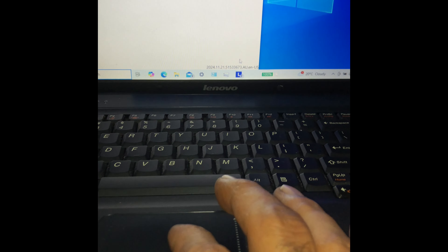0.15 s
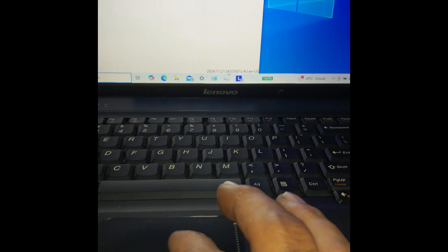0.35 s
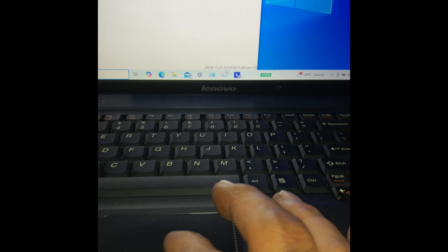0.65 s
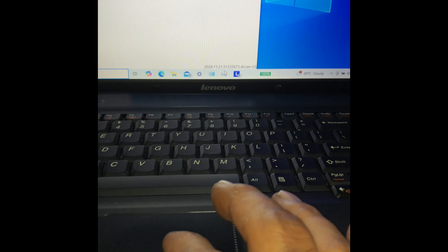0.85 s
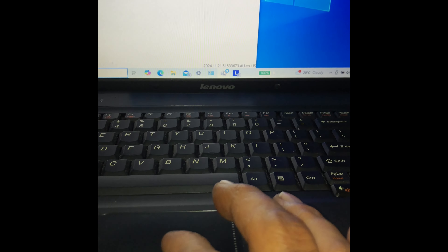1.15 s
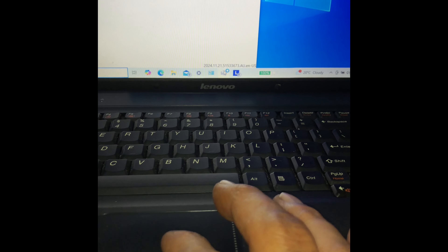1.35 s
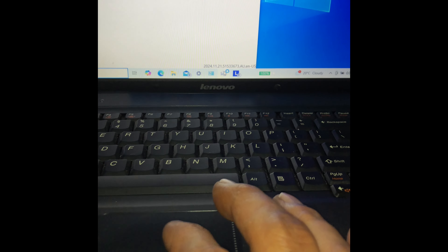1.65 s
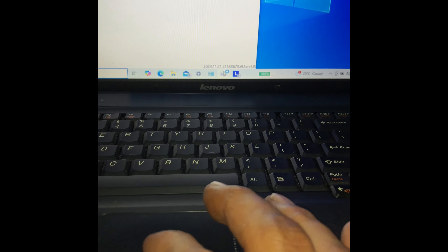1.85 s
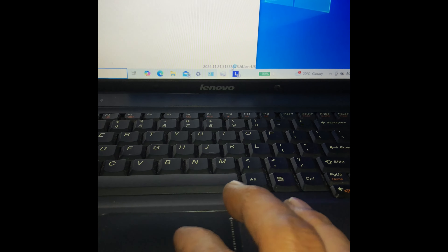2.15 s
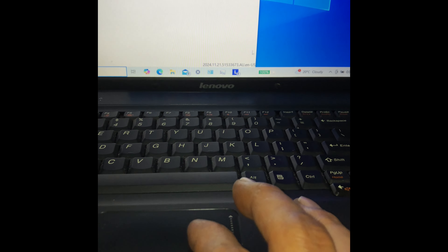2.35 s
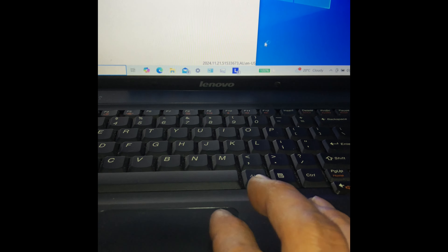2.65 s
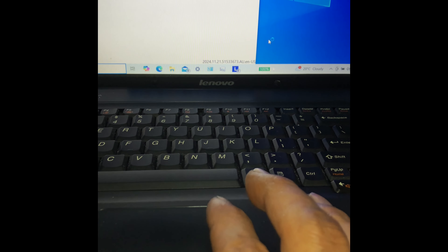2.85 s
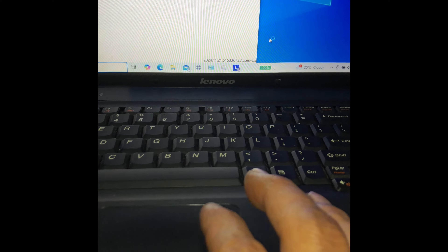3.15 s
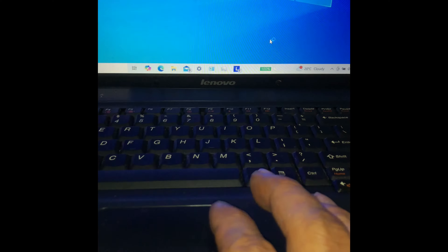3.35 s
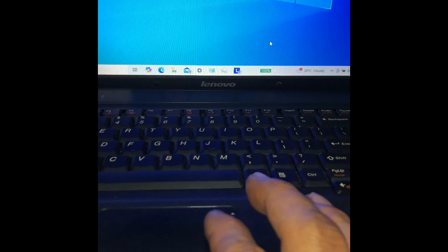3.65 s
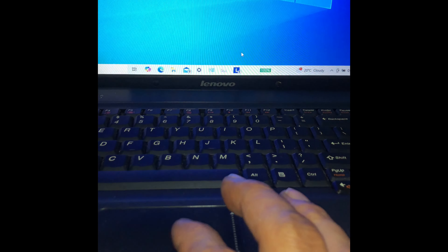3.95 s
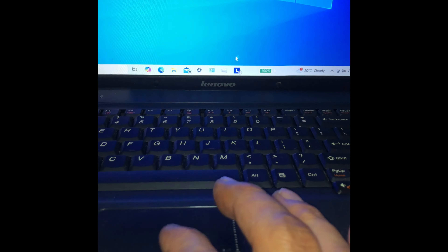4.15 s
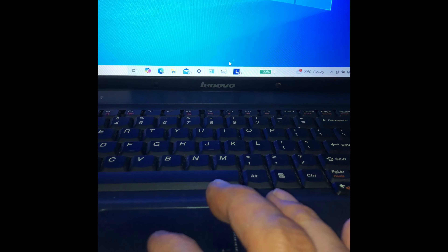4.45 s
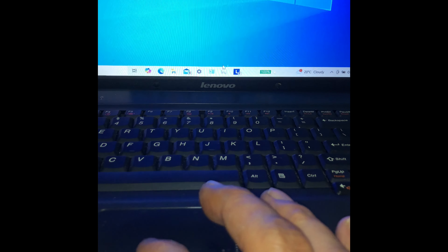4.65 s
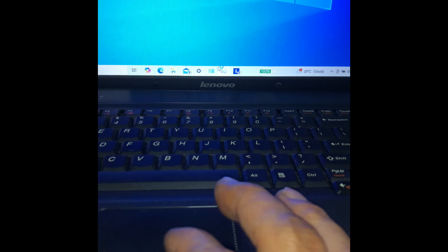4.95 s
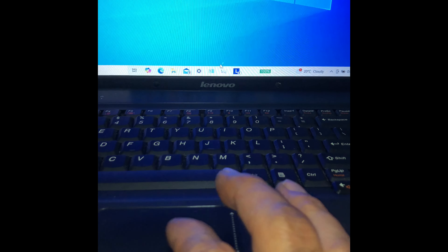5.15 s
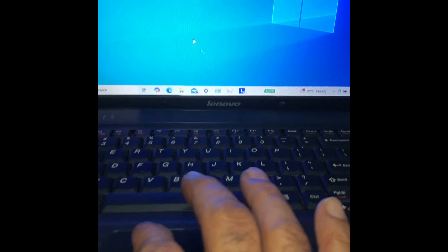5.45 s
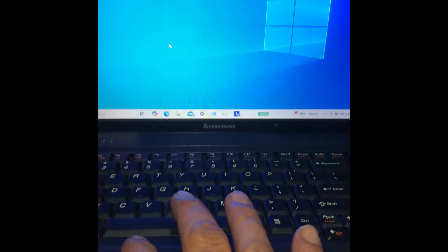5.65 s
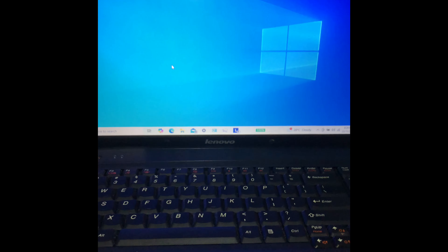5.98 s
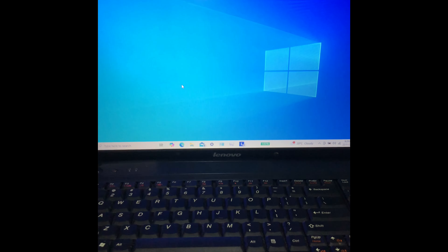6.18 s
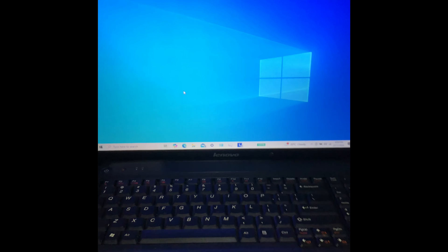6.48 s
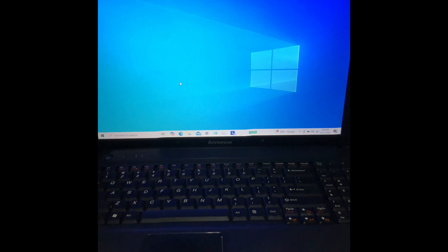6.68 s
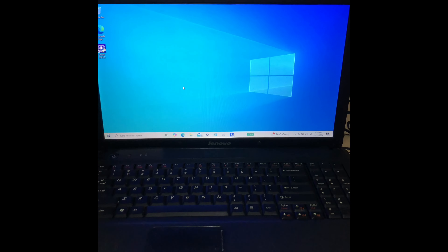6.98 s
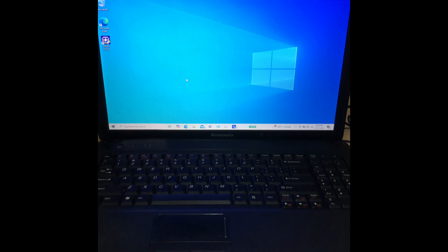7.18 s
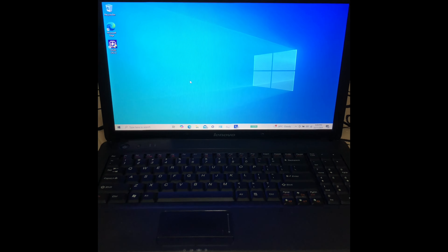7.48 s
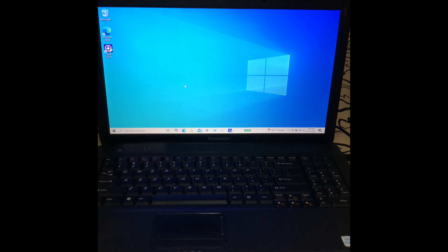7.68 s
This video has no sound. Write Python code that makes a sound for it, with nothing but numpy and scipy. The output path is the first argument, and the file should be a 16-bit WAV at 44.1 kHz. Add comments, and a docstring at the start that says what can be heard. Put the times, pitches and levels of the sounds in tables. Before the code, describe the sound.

A steady fan drone fills a quiet room, its airy rush dark and smooth, its motor humming with a slight waver. A lone soft knock sounds near the middle and another fainter one later. As the person holding the microphone leans back, fabric brushes briefly twice and the seat ticks and knocks irregularly for about a second, then settles with tiny creaks while the fan carries on.

```python
"""In a quiet room a fan runs steadily, and one microphone listens.
The fan's rushing air is noise coloured by the room and its housing; its mains motor hums in wavering sine tones.
Near the end the holder of the microphone leans back. Cloth slides twice, as hiss with a lower rustle,
and the seat ticks and knocks softly, as short bursts of damped ringing."""
import sys
import numpy as np
from scipy import signal
from scipy.fft import rfft, irfft, next_fast_len
from scipy.io import wavfile
from scipy.ndimage import uniform_filter1d

SR = 44100
rng = np.random.default_rng(int(sys.argv[2]) if len(sys.argv) > 2 else 0)


def transcribe(signal):
    """Save signal, clipped to [-1, 1], as a 16-bit WAV file at the path in sys.argv[1]."""
    frames = np.atleast_2d(signal).T
    limited = np.clip(frames, -1, 1)
    pcm = np.round(limited * 32767).astype(np.int16)
    wavfile.write(sys.argv[1], SR, pcm)


def boost_factor(decibels):
    """Convert a level in decibels to a linear amplitude factor."""
    exponent = np.asarray(decibels, float) / 20
    return 10 ** exponent


N = 344853
TIME = np.arange(N) / SR  # seconds


def unit(x):
    """Scale a signal to an rms of 1."""
    return x / np.sqrt(np.mean(x ** 2))


def walk(rate):
    """Smooth random wandering that changes about rate times a second, with an rms of 1."""
    length = max(int(SR / rate), 1)
    smoothed_once = uniform_filter1d(rng.standard_normal(N), length)
    return unit(uniform_filter1d(smoothed_once, length))


def noise(spectrum, resonances=()):
    """Noise coloured by a spectrum of (Hz, dB), raised or lowered around each resonance."""
    size = next_fast_len(N)
    hz = np.maximum(np.arange(size // 2 + 1) * SR / size, 1)
    points = np.array(spectrum, float)
    db = np.interp(np.log(hz), np.log(points[:, 0]), points[:, 1])
    # below the first point the level falls by 40 dB per decade
    db = db + 40 * np.minimum(np.log10(hz / points[0, 0]), 0)
    for centre_hz, width_hz, lift_db in resonances:
        db = db + lift_db / (1 + (2 * (hz - centre_hz) / width_hz) ** 2)
    white = rfft(rng.standard_normal(size))
    return irfft(white * boost_factor(db), size)[:N]


def band(x, low_hz, high_hz):
    """Keep only the pitches between two limits."""
    return signal.sosfilt(signal.butter(2, [low_hz, high_hz], "band", fs=SR, output="sos"), x)


def tone(hz, db, waver_db, drift_hz):
    """A sine whose level and pitch wander slowly as the air carries it."""
    cycles = np.cumsum(hz + drift_hz * walk(2.88)) / SR
    phase = 2 * np.pi * (rng.random() + cycles)
    return np.sqrt(2) * boost_factor(db + waver_db * walk(3.1)) * np.sin(phase)


def ring(hz, t60, lag):
    """One damped mode that starts softly after a lag and falls 60 dB in t60 seconds (at least 3 ms)."""
    t = np.maximum(np.arange(SR // 10) / SR - lag, 0)
    decay = np.exp(-np.log(1000) * t / max(t60, .003))
    soft_start = 1 - np.exp(-t / 0.00077)
    return np.sin(2 * np.pi * hz * t) * decay * soft_start


def room(x):
    """Dense reflections off nearby surfaces comb the treble finely."""
    t60_s, reflections_db = .2, -18
    t = np.arange(SR // 3) / SR
    tail = band(rng.standard_normal(len(t)), 2000, 9200) * np.exp(-np.log(1000) * t / t60_s)
    tail = tail / np.sqrt(np.sum(tail ** 2))
    return x + boost_factor(reflections_db) * signal.fftconvolve(x, tail)[:N]


def moved():
    """How far the microphone has been drawn back along its move, 0 to 1."""
    middle_s, time_scale_s = 6.2, .25
    return .5 + .5 * np.tanh((TIME - middle_s) / time_scale_s)


def knocks():
    """A joint of the seat slips with a short tick; the frame answers a moment later, mostly lower in pitch."""
    # Knocks of the seat. Each row: time in seconds, level in dB, sharpness (tick against level) in dB.
    seat_knocks = [(3.513, -38.5, -18), (5.483, -42, -18), (6.359, -41, -13), (6.417, -35, -5.5),
                   (6.46, -47, 5), (6.554, -32.5, -2.5), (6.597, -43, -11), (6.663, -35.5, -12),
                   (6.759, -38, -7), (6.869, -37, -0.5), (6.927, -38, -7), (6.948, -43, -5),
                   (7.126, -37.5, -7), (7.169, -43, -11), (7.181, -40, -13), (7.204, -39, -14),
                   (7.285, -46, 4), (7.378, -37, -10)]
    # Ringing modes of the frame. Each row: pitch in Hz, level in dB, 60 dB decay in seconds, lag in seconds.
    frame = [(306, -6.5, 0.023, 0.0027), (520, 3, 0.017, 0.0016), (747, -1.5, 0.016, 0.0011),
             (895, -4, 0.0095, 0.00054)]
    tick_hz, tick_t60_s, tick_lead_s = 1200, 0.019, 0.00154
    # a softer, less sharp knock wakes the upper modes less
    soft_tilt_per_octave, usual_sharp_db = .4, -3
    # further, fainter knocks of the seat, scattered at random while it settles
    faint_count, faint_from_s, faint_to_s = 12, 6.35, 8.2
    faint_db, faint_spread_db, faint_sharp_db = -48, 2.5, -11

    faint_knocks = []
    for when, strength in rng.random((faint_count, 2)):
        faint_s = faint_from_s + when * (faint_to_s - faint_from_s)
        faint_knocks.append((faint_s, faint_db + faint_spread_db * (2 * strength - 1), faint_sharp_db))
    # every blow rings at slightly different pitches: one factor per mode, the last for the tick
    detune = 1 + .035 * rng.standard_normal((len(seat_knocks) + faint_count, len(frame) + 1))
    out = np.zeros(N + SR)
    for (s, db, sharp_db), factors in zip([*seat_knocks, *faint_knocks], detune):
        tilt_db = soft_tilt_per_octave * min(sharp_db - usual_sharp_db, 0)
        body = 0
        for (hz, mode_db, t60, lag), factor in zip(frame, factors):
            octaves_up = max(np.log2(hz / frame[1][0]), 0)  # above the second mode
            body = body + boost_factor(mode_db + tilt_db * octaves_up) * ring(hz * factor, t60, lag)
        tick = boost_factor(sharp_db) * ring(tick_hz * factors[-1], tick_t60_s, 0)
        blow = boost_factor(db) * (body + tick)
        start = int((s - tick_lead_s) * SR)
        out[start:start + len(blow)] += blow
    return out[:N]


def cloth():
    """Fibres catch and let go: a bright, finely grained hiss, and a lower rustle that climbs as a fold tightens."""
    # Colour of the hiss. Each row: pitch in Hz, relative level in dB.
    hiss_spectrum = [(1500, -1), (2200, 1), (4000, 4.5), (8000, 0.5), (15700, -5)]
    # Slides of the cloth. Each row: sets in, full speed and slows, all in seconds, level in dB,
    # fade in dB per second, rustle against hiss in dB.
    slides = [(6.062, 6.242, 6.29, -64, 54, 0.5), (6.45, 6.598, 6.865, -66, 130, -1)]
    swell_db_per_s, catch_db_per_s = 38, 200  # how fast a slide gathers speed; how sharply it sets in
    rustle_hz, climb_hz_per_s, rustle_width_hz = 1398, 2000, 340  # the climb ends at rustle_hz

    out = 0
    for sets_in_s, full_s, slows_s, db, fade_db, rustle_db in slides:
        level_db = db - swell_db_per_s * np.maximum(full_s - TIME, 0)
        level_db = level_db - catch_db_per_s * np.maximum(sets_in_s - TIME, 0)
        level_db = level_db - fade_db * np.maximum(TIME - slows_s, 0)
        hiss = noise(hiss_spectrum)
        hiss = hiss / np.std(band(hiss, 5000, 15000))  # its treble sets the level
        hz = np.clip(rustle_hz + climb_hz_per_s * (TIME - full_s), rustle_hz / 2, rustle_hz)
        phase = 2 * np.pi * np.cumsum(hz) / SR
        # a narrow band of noise around the climbing pitch
        rustle = walk(rustle_width_hz) * np.cos(phase) + walk(rustle_width_hz) * np.sin(phase)
        rustle = rustle * boost_factor(2.8 * walk(40))
        out = out + boost_factor(level_db + 1.05 * walk(60)) * (hiss + boost_factor(rustle_db) * rustle)
    return out


def motor():
    """The field pulls at even multiples of the mains; the turning rotor shifts it by its own speed."""
    # Motor hum. Each row: multiple of the mains, shaft turns added, usual level in dB rms, waver in dB,
    # change after the microphone's move in dB.
    hum_tones = [(2, -1, -73, 6, 0), (2, 0, -60, -1, 0), (4, 0, -69.5, 9.5, 1), (8, -1, -64, -0.4, 0),
                 (8, 0, -60.5, 0.2, -4), (8, 0.99, -55, 0.15, 2)]
    # Thin whines. Each row: pitch in Hz, usual level in dB rms.
    whines = [(717.3, -77.5), (882.9, -79.5), (1623.7, -80), (2088.7, -85)]
    mains_hz, shaft_hz = 50.02, 22.1

    out = 0
    for multiple, turns, db, waver_db, move_db in hum_tones:
        hz = multiple * mains_hz + turns * shaft_hz
        # each tone has its own standing wave in the room, so a move raises one and lowers another
        out = out + tone(hz, db + move_db * moved(), waver_db, drift_hz=.05)
    for hz, db in whines:
        out = out + tone(hz, db, waver_db=2.2, drift_hz=1.455)
    return out


def air():
    """Turbulence off the blades, coloured by room and housing; eddies make it swell slightly."""
    # Colour of the rushing air. Each row: pitch in Hz, relative level in dB.
    air_spectrum = [(22, -40), (40, -25.5), (60, -12.5), (100, -9.5), (230, -6.5), (350, -14.5),
                    (450, -19.5), (780, -29), (1200, -25.5), (1800, -30.5), (2200, -35), (3800, -36),
                    (5500, -42.5), (9000, -49), (15700, -55.5)]
    # Resonances of room and housing. Each row: centre in Hz, width in Hz, lift (or dip, if negative) in dB.
    resonances = [(54.5, 6.6, 6), (133.2, 24.2, 10), (330, 21, 3.5), (557, 23, 5), (620, 14, 3),
                  (996, 20, 3.5), (1061, 21, 7), (1110, 18, 5), (1434, 27, 8), (1543, 18, 3.5),
                  (1595, 52, 7), (1718, 49, 6), (1855, 28, 6), (2480, 24, 2.5), (4540, 670, 0.5),
                  (7540, 700, 1.5), (66, 8.6, -3.5), (152, 11.5, -3.5), (302, 22, -4), (434, 12, -4.5),
                  (499, 22, -4.5), (583, 17, -5), (802, 30, 0.5), (366, 8.8, -3.5), (1213, 23, -7),
                  (1480, 25, -2), (2190, 200, -1.5), (5340, 630, -1), (8600, 700, -1)]
    level_db = -46 + .3 * walk(3)
    rush = room(noise(air_spectrum, resonances))
    return boost_factor(level_db) * unit(rush)


def scene():
    """Seat, cloth, motor and rushing air add up at one microphone."""
    return (air() + motor() + cloth() + knocks())[None]


def roll_off(x):
    """The treble ends steeply here."""
    return signal.sosfilt(signal.butter(12, 15710, fs=SR, output="sos"), x)


def record(dry):
    """The finished mix as a phone keeps it."""
    return roll_off(dry)


dry = scene()
out = record(dry)
transcribe(out)
```